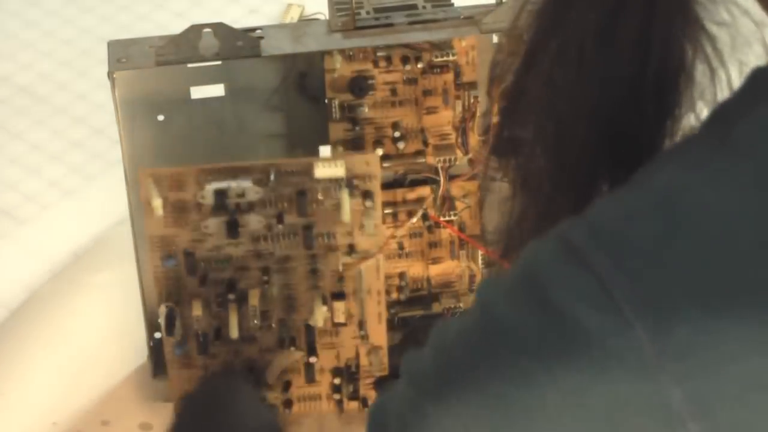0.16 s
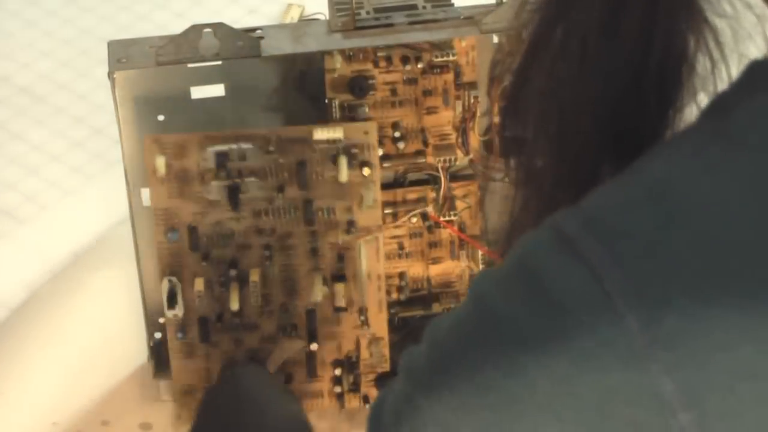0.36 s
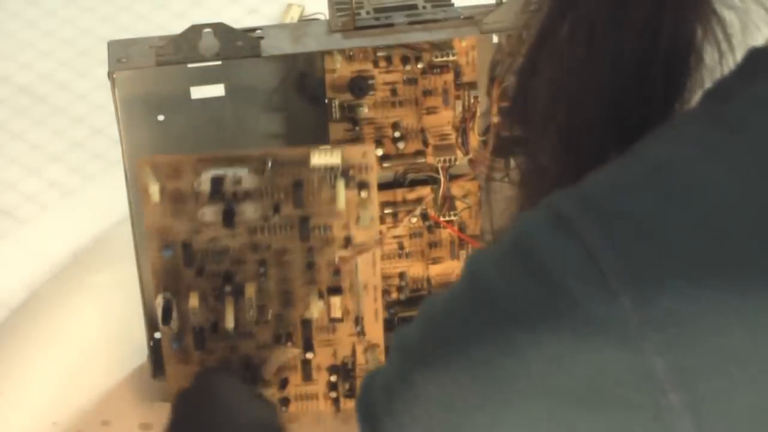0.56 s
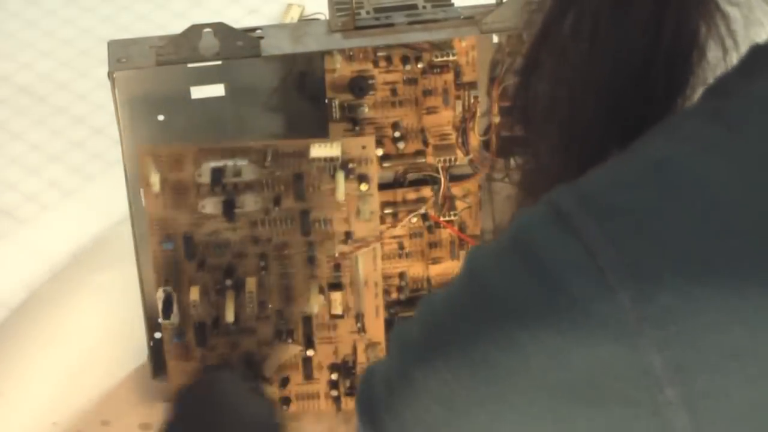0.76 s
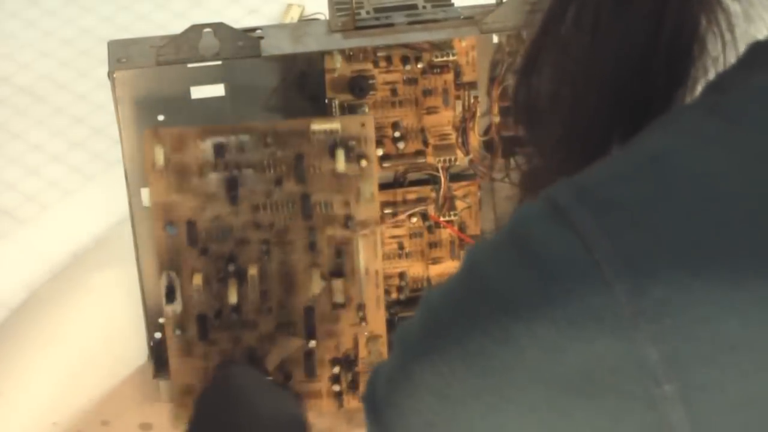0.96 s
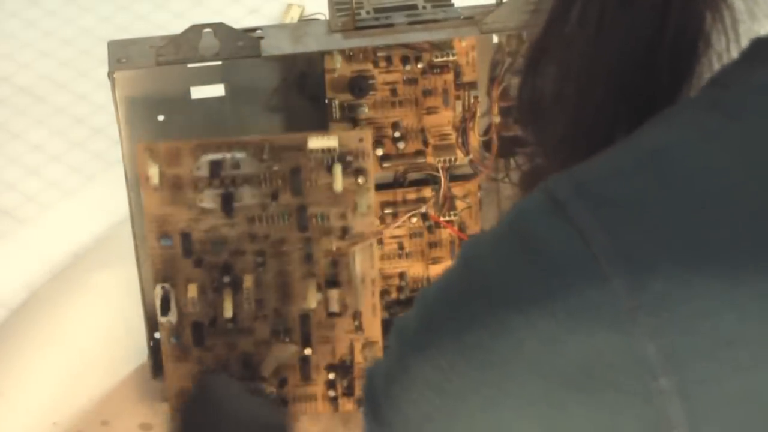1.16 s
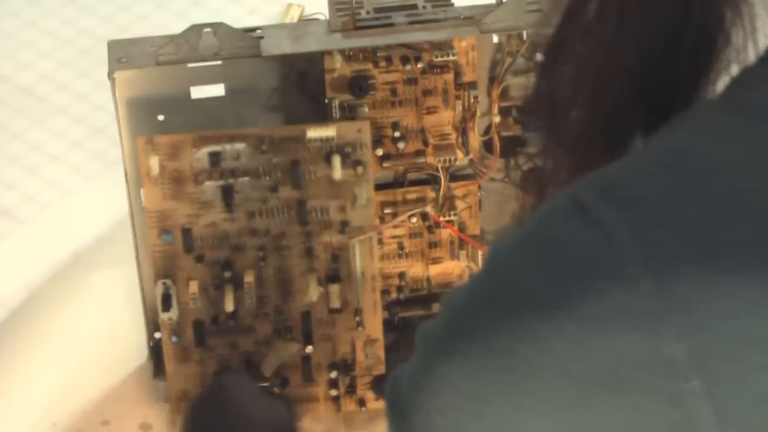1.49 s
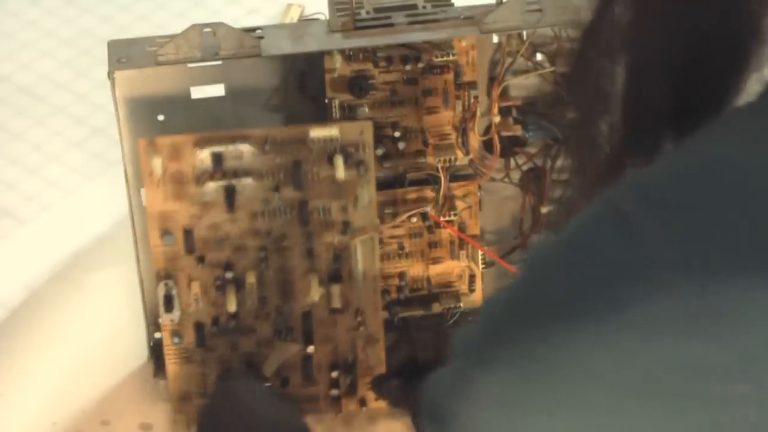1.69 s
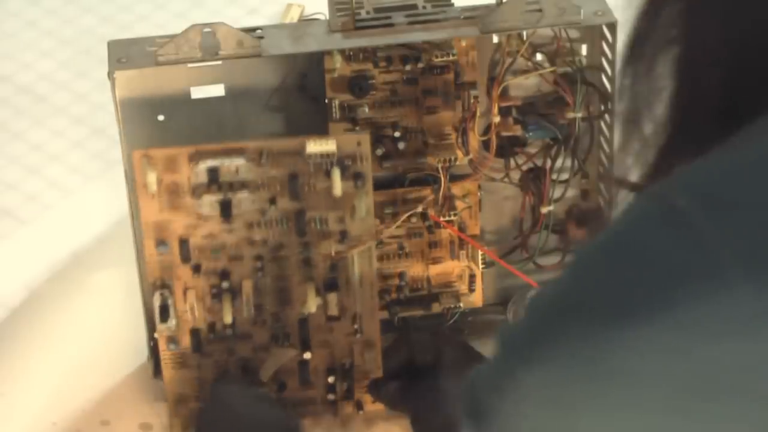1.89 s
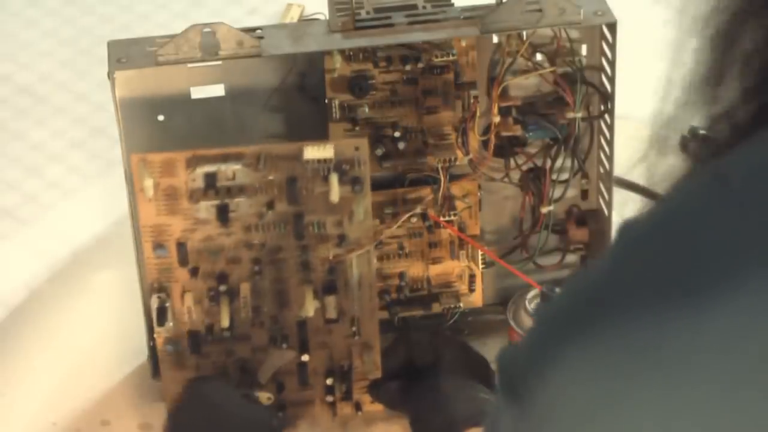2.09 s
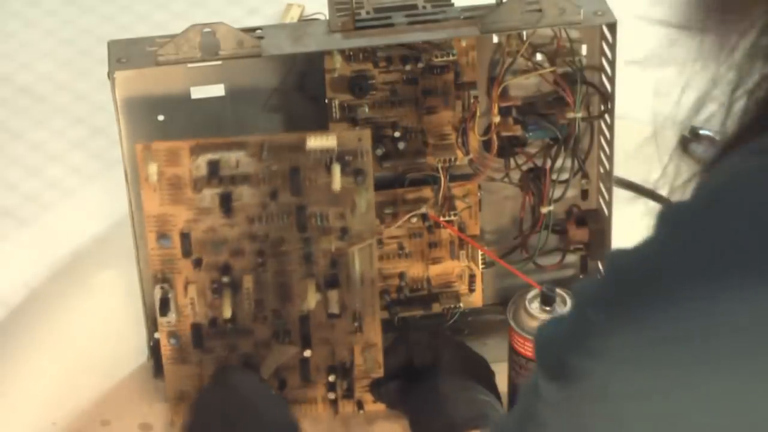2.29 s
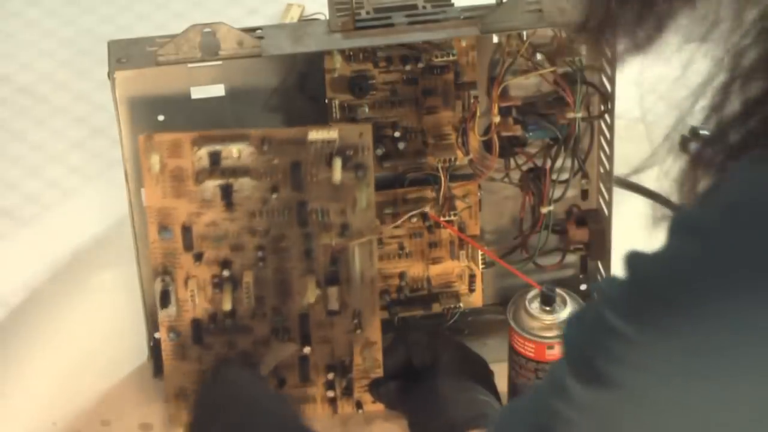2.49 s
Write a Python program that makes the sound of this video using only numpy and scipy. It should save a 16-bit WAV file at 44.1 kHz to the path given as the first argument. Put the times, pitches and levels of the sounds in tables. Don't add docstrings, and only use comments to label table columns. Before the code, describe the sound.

Loud, bright click-clack pairs from a tiny slide switch repeat about seven times a second, with light board knocks, rattle and brief steel chassis ring, close-miked in a small room with faint hum.

```python
import sys
import numpy as np
from scipy import signal
from scipy.fft import rfft, irfft, next_fast_len
from scipy.io import wavfile
from scipy.ndimage import uniform_filter1d

SR = 44100
rng = np.random.default_rng(int(sys.argv[2]) if len(sys.argv) > 2 else 0)


def gain_from_decibels(decibels):
    exponent = np.asarray(decibels, float) / 20
    return 10 ** exponent


def bounce(signal):
    frames = np.transpose(np.atleast_2d(signal))
    limited = np.clip(frames, -1, 1)
    pcm = np.round(limited * 32767).astype(np.int16)
    wavfile.write(sys.argv[1], SR, pcm)


N = 116865
PAD = 4096

# f/Hz, width/Hz, level/dB
SPRING_MODES = [(2700, 850, 3), (5940, 3000, 3.5), (10150, 5500, 9.5), (14300, 5800, 6)]
SNAP_RISE_S, SNAP_T60_S = 0.00082, 0.01


def unit(x):
    return x / np.sqrt(np.mean(x ** 2) + 1e-20)


def along(points, hz):
    f, v = np.transpose(points)
    return np.interp(np.log(hz + 1), np.log(f + 1), v)


def filtered(x, response):
    n = x.shape[-1]
    m = next_fast_len(n + PAD)
    return irfft(rfft(x, m) * response(np.fft.rfftfreq(m, 1 / SR)), m)[..., :n]


def high_pass(hz, corner_hz):
    return 1j * hz / (corner_hz + 1j * hz)


def resonance(hz, centre_hz, width_hz, db):
    damping = 1j * hz * width_hz
    return gain_from_decibels(db) * damping / (centre_hz * centre_hz - hz * hz + damping)


def stereo_noise(n):
    # f/Hz, left-right likeness (0..1)
    likeness = [(60, 0.37), (240, 0.73), (950, 0.69), (3770, 0.56), (15000, 0.025)]

    def mid_side(hz):
        turn = np.arccos(np.clip(along(likeness, hz), -1, 1)) / 2
        return np.array([np.cos(turn), np.sin(turn)])

    mid, side = filtered(rng.standard_normal((2, n)), mid_side)
    return np.array([mid + side, mid - side])


def air():
    # f/Hz, level/dB per Hz
    tone_spectrum = [(15, -54), (25, -49), (108, -2.5), (734, -9), (911, -1), (1650, -1), (7310, -16.5),
                     (9570, -13.5), (16000, -22)]
    air_db, hum_hz, hum_db = -51, 119, -66
    hum = gain_from_decibels(hum_db) * np.sin(2 * np.pi * hum_hz * np.arange(N) / SR)
    noise = filtered(stereo_noise(N), lambda hz: gain_from_decibels(along(tone_spectrum, hz)))
    return gain_from_decibels(air_db) * unit(noise) + hum


def bumps():
    # t/s, level/dB, f/Hz
    hand_bumps = [
        (1.63, -40.5, 220),
        (1.87, -39.5, 168),
        (.13, -42, 240),
        (2.2, -46, 230),
    ]
    rise_s, t60_s = 0.0047, 0.1
    t = np.arange(N) / SR
    total = np.zeros(N)
    for start_s, db, hz in hand_bumps:
        u = np.clip(t - start_s, 0, None)
        total += gain_from_decibels(db - 60 * u / t60_s) * (1 - np.exp(-u / rise_s)) * np.sin(2 * np.pi * hz * u)
    return total


def room(x):
    # f/Hz, t60/s
    decay = [(150, 0.33), (400, 0.3), (1000, 0.24), (3000, 0.22), (8000, 0.28), (15000, 0.16)]
    # f/Hz, level/dB
    colour = [(200, 12.5), (600, 0), (1500, -0.5), (4000, -1.5), (7500, -2), (10000, -6), (15000, 0.5)]
    gap_s, late_db, late_stretch = 0.0021, -15, 3
    hz, t, z = signal.stft(stereo_noise(SR // 2), SR, nperseg=256)
    fall_db = -60 * t / along(decay, hz)[:, None]
    envelope = gain_from_decibels(fall_db) + gain_from_decibels(late_db + fall_db / late_stretch)
    tail = signal.istft(z * gain_from_decibels(along(colour, hz)[:, None]) * envelope, SR, nperseg=256)[1]
    tail = tail * (1 - np.exp(-(np.arange(tail.shape[1]) / SR / gap_s) ** 2))
    return signal.fftconvolve(x[None], tail / np.linalg.norm(tail[0]), axes=1)


def bench(x):
    level_db, t60_s, corner_hz = -4, .006, 5000
    scatter = rng.standard_normal((2, 512)) * gain_from_decibels(-60 * np.arange(512) / SR / t60_s)
    scatter = scatter / np.linalg.norm(scatter, axis=1, keepdims=True)
    treble = filtered(x, lambda hz: high_pass(hz, corner_hz))
    return gain_from_decibels(level_db) * signal.fftconvolve(treble[None], scatter, axes=1)


def rung(x, peaks):
    scatter_db = 2
    modes = [(c, w, db + scatter_db * rng.standard_normal()) for c, w, db in peaks]

    def response(hz):
        return sum((-1) ** k * resonance(hz, *mode) for k, mode in enumerate(modes))

    y = filtered(x, response)
    return y / np.sqrt(np.sum(y ** 4) / np.sum(y ** 2)) / 2


def chatter(lead_s, rise_s, t60_s):
    lump_db, evenness = 5, .8
    t = np.clip((np.arange(3 * PAD) - PAD) / SR + lead_s, 0, None)
    lumps = gain_from_decibels(lump_db * unit(uniform_filter1d(rng.standard_normal(len(t)), size=9)))
    envelope = (1 - np.exp(-(t / rise_s) ** 2)) * gain_from_decibels(-60 * t / t60_s)
    z = rfft(envelope * lumps * rng.standard_normal(len(t)))
    return (t > 0) * irfft(z / uniform_filter1d(np.abs(z), size=60) ** evenness, len(t))


def blow(knock_hz, knock_db, modes, rise_s, t60_s, high_db=-12):
    # f/Hz, level/dB, t60/s
    chassis = [(475, 1, 0.14), (810, 3, 0.11), (1141, 21, 0.061), (1310, -18, 0.1), (1710, -13, 0.12),
               (1890, 12, 0.15), (4580, 14.5, 0.012), (5000, 0, 0.073), (5300, -33, 0.038),
               (9300, 13.5, 0.014)]
    rattle_t60_s, rattle_db, chassis_db = 0.057, -15.5, -20
    hit = chatter(0, rise_s, t60_s)
    board = [(586, 465, -9), (knock_hz, 450, 0), (2590, 295, high_db)]  # f/Hz, width/Hz, level/dB
    steel = [(hz, np.log(1000) / (np.pi * t), db) for hz, db, t in chassis]
    rattle = rung(chatter(0, 0.0014, rattle_t60_s), board + list(modes))
    switch = rung(hit, modes)
    knock = gain_from_decibels(knock_db) * rung(hit, board)
    return switch + knock + gain_from_decibels(rattle_db) * rattle + gain_from_decibels(chassis_db) * rung(hit, steel)


def snap(start_s, db, knock_hz, knock_db, high_db):
    # f/Hz, width/Hz, level/dB
    detent = [(2750, 610, -10), (3940, 420, -2.5), (4893, 210, 0.5), (5900, 800, -9), (7330, 1160, -9.5),
              (9510, 780, 2), (11050, 1400, -1.5), (11360, 530, 2), (13240, 1300, -4.5), (14900, 720, -7)]
    # t/s, slide time before snap/s
    slide_time = [(.12, .0065), (.29, .008), (.45, .008), (.75, .0068), (2.5, .0062)]
    snap_db, scrape_rise_s, scrape_t60_s, scrape_db = -6.5, 0.0013, 0.012, -13.5
    click = blow(knock_hz, knock_db, detent, SNAP_RISE_S, SNAP_T60_S, high_db)
    lead_s = np.interp(start_s, *np.transpose(slide_time))
    scrape = rung(chatter(lead_s, scrape_rise_s, scrape_t60_s), SPRING_MODES)
    return gain_from_decibels(db + snap_db) * (click + gain_from_decibels(scrape_db) * scrape)


def stop(db, knock_hz, knock_db, rebound_db):
    # f/Hz, width/Hz, level/dB
    housing = [(2750, 570, -13.5), (3570, 520, -3), (4310, 980, -4), (5784, 1080, -2.5), (8210, 1500, -7),
               (9210, 1210, -4.5), (10962, 600, 3.5), (11214, 810, 2), (12200, 1500, -7.5),
               (14600, 1800, -15)]
    stop_db, stop_rise_s, stop_t60_s = -2, 0.00022, 0.015
    touch_lead_s, touch_db, rebound_s = .002, -17, .0235
    slam = blow(knock_hz, knock_db, housing, stop_rise_s, stop_t60_s)
    touch = rung(chatter(touch_lead_s, 0.00098, 0.028), SPRING_MODES)
    rebound = rung(chatter(-rebound_s, .0004, 0.012), SPRING_MODES)
    return gain_from_decibels(db + stop_db) * (slam + gain_from_decibels(touch_db) * touch + gain_from_decibels(rebound_db) * rebound)


def switches():
    # t/s, peak/dB, board knock f/Hz, knock over snap/dB, upper board mode over knock/dB
    snaps = [(0.1186, -2.5, 1450, -3.5, -7), (0.2954, -5.5, 1210, -3, -5.5),
             (0.4434, -2.5, 1620, -6.5, -20), (0.6085, -3.5, 1600, -2, -11), (0.7446, 0.5, 1280, -6.5, -5),
             (0.9049, -1.5, 1620, -2.5, -4.5), (1.041, 1.5, 1740, -6.5, -21), (1.1862, 0, 1780, -3.5, -2.5),
             (1.3219, 2, 1290, -7, -9), (1.4555, 1, 1570, 0, -4.5), (1.5648, -2.5, 1240, -2.5, -5),
             (1.698, 2, 1970, -5, -1.5), (1.7985, -1, 1350, -4.5, -5), (1.932, 0, 1740, -1, -6),
             (2.0428, -1.5, 1400, -1, -17), (2.1843, 2, 796, -7, -7), (2.3261, -3, 1166, -4, -6),
             (2.4899, -1.5, 1770, -5.5, 0)]
    # t/s, peak/dB, board knock f/Hz, knock over stop/dB, rebound over stop/dB
    stops = [(0.1298, -1.5, 1320, -12.5, -10), (0.3243, -5, 746, -9, -15), (0.4589, -4.5, 1750, -12, -12),
             (0.63, -2.5, 713, -12, -13), (0.7583, -2.5, 1460, -13.5, -15), (0.9265, -3, 740, -11, -17),
             (1.0536, -3, 750, -13.5, -14), (1.1988, -4, 800, -11.5, -27), (1.336, -2.5, 1560, -16.5, -17),
             (1.4658, -2.5, 736, -12, -18), (1.5795, -2, 1480, -11.5, -13), (1.7259, -3.5, 2660, -4.5, -24),
             (1.8125, -2.5, 1340, -9.5, -16), (1.961, -3.5, 730, -10.5, -20), (2.056, -2.5, 1360, -10, -17),
             (2.2034, -1, 725, -13.5, -17), (2.3413, -3, 1220, -13, -13)]
    # t/s, peak/dB, f/Hz, knock/dB, rebound/dB
    earlier_stop = (-.035, -1, 1400, -8, -20)
    # t/s, peak/dB, board knock f/Hz, knock over tick/dB
    last_tick = (2.6285, -31, 2400, -10)
    sounds = [(row[0], snap(*row)) for row in snaps]
    sounds += [(row[0], stop(*row[1:])) for row in [earlier_stop, *stops]]
    tick_s, db, hz, knock_db = last_tick
    sounds.append((tick_s, gain_from_decibels(db) * blow(hz, knock_db, SPRING_MODES, SNAP_RISE_S, SNAP_T60_S)))

    near, far = np.zeros(N + 2 * SR), np.zeros((2, N + 2 * SR))
    for start_s, x in sounds:
        i, wet = SR + round(start_s * SR) - PAD, room(x)
        near[i:i + len(x)] += x
        far[:, i:i + wet.shape[1]] += wet
        far[:, i:i + len(x)] += bench(x)[:, :len(x)]
    return near[SR:SR + N], far[:, SR:SR + N]


def scene():
    # f/Hz, phase/rad
    phase_lead = [(1100, .1), (4100, -1.03), (6400, -0.82), (7750, -1.66), (9400, -0.52), (13300, -1.22),
                  (16000, -1.6)]
    # f/Hz, level/dB
    balance = [(60, 17), (180, -1.5), (550, -0.5), (1650, -3), (4970, -4.5), (15000, -0.5)]
    # f/Hz, width/Hz, level/dB
    panels = [(750, 80, -4), (1160, 120, -2)]
    room_db, low_cut_hz, thud_hz, thud_db = -6, 133, 45, -57
    near, far = switches()
    side = np.array([[1], [-1]]) / 2
    direct = filtered(near, lambda hz: np.exp(1j * side * along(phase_lead, hz)))
    far = filtered(far, lambda hz: 1 + sum(resonance(hz, *panel) for panel in panels))
    placed = filtered(direct + gain_from_decibels(room_db) * far,
                      lambda hz: gain_from_decibels(side * along(balance, hz)) * high_pass(hz, low_cut_hz) ** 2)
    thud = filtered(near ** 2, lambda hz: 1j * hz * thud_hz / (thud_hz + 1j * hz) ** 2)
    return placed + gain_from_decibels(thud_db) * thud / np.abs(thud).max() + bumps() + air()


def band_limit(x):
    return signal.sosfilt(signal.butter(12, 16980, fs=SR, output="sos"), x)


def record(dry):
    shelf_hz, shelf_db, edge_hz = 15900, -12, 16500
    limited = filtered(dry, lambda hz: gain_from_decibels(shelf_db * (hz > shelf_hz)) * (hz < edge_hz))
    mix = np.clip(limited, -1, 1)
    return band_limit(mix)


dry = scene()
out = record(dry)
bounce(out)
```